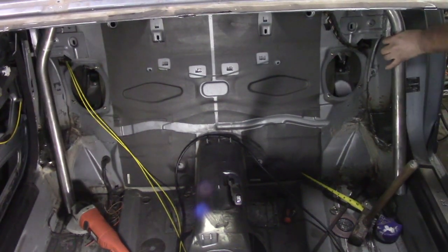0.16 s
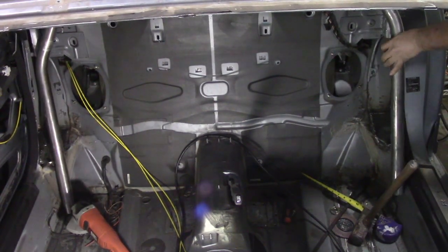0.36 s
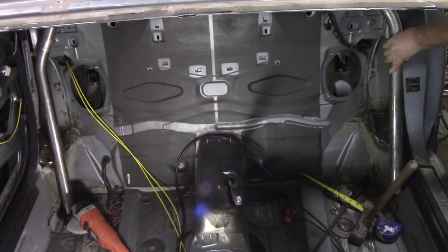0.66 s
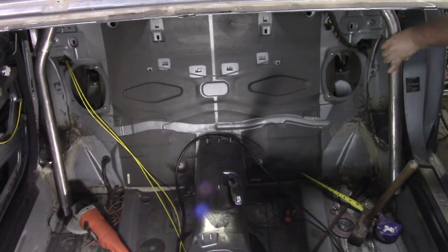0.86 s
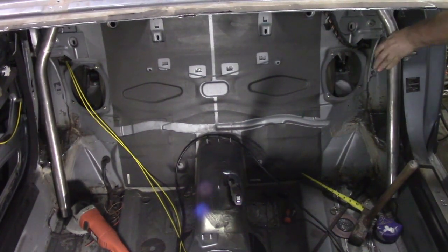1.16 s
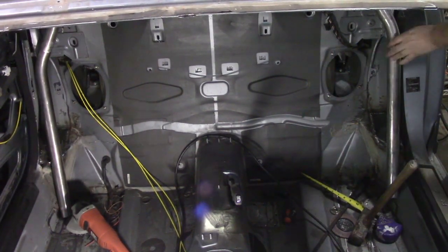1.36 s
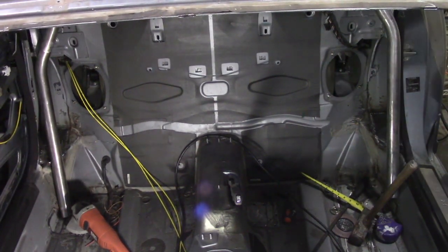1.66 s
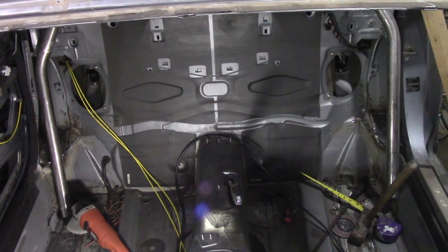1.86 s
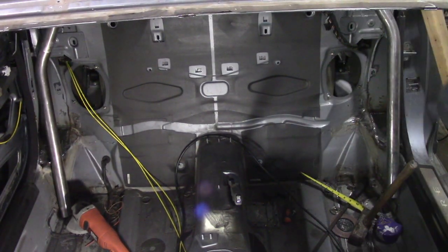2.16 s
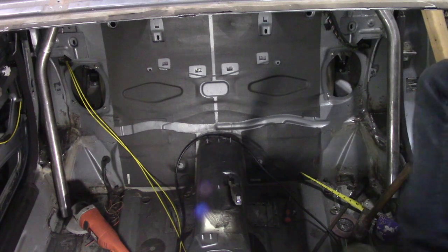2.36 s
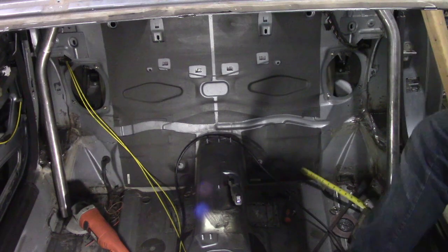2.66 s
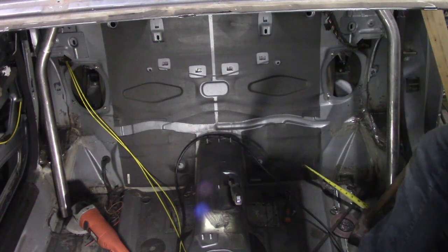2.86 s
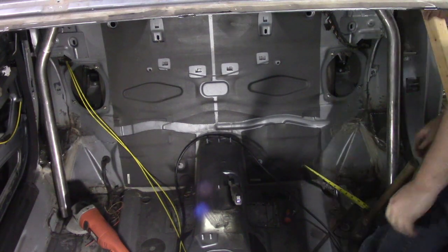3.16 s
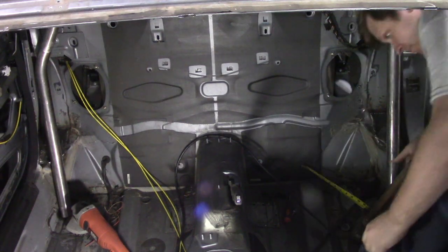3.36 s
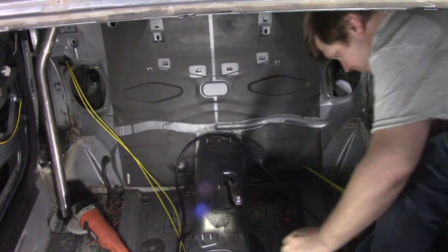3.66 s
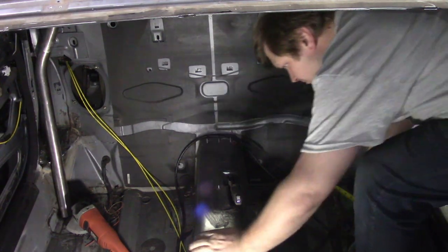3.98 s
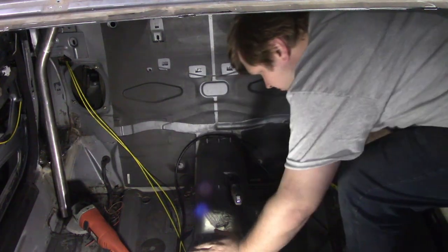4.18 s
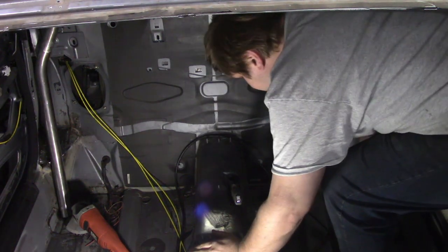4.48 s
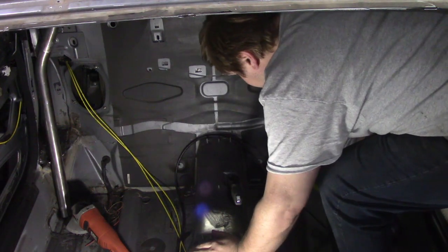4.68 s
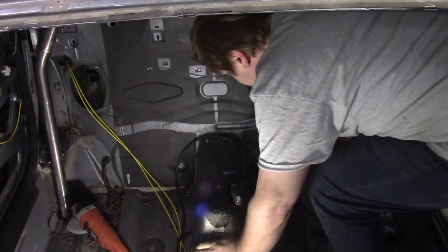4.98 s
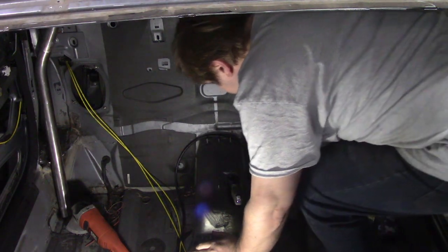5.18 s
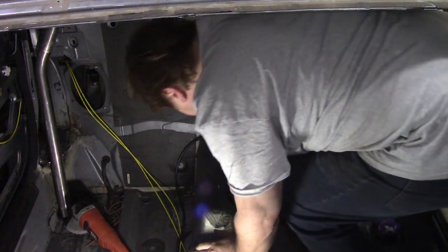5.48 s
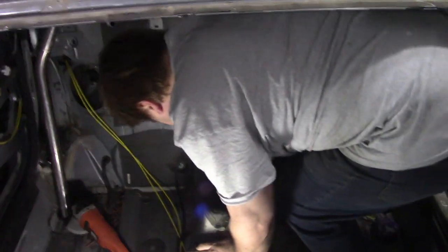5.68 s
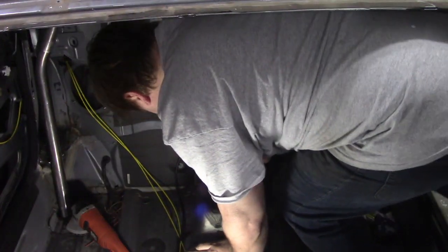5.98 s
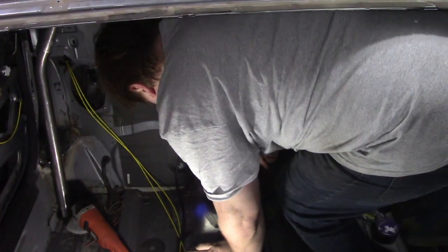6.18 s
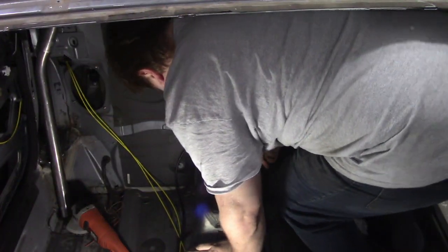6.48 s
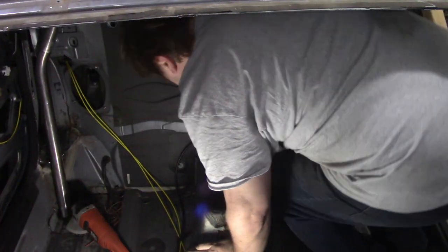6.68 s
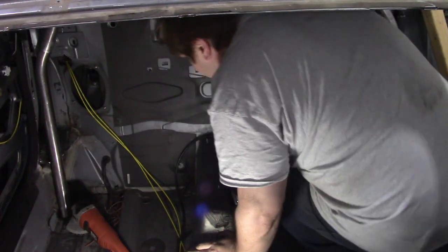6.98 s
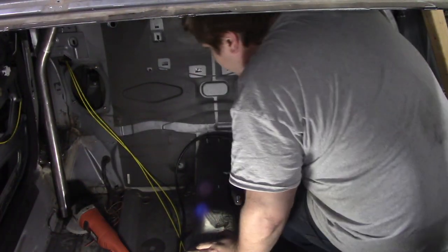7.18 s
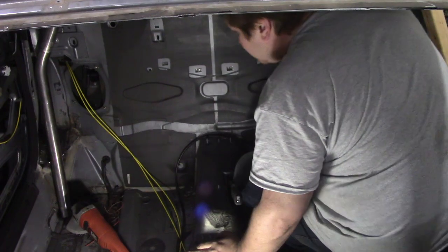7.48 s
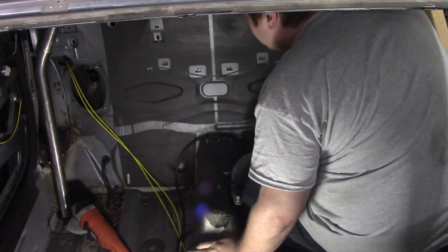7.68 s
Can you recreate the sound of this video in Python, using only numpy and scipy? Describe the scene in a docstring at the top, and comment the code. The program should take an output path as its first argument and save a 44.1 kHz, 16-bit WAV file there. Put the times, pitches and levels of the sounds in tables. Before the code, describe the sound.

Close, hollow, bare-metal sound inside a stripped car shell in a garage, with faint steady hiss. At 0 s a hard steel-tube knock rings; more follow at 0.26 and the strongest near 0.5, with brief sliding scrapes and beating metallic ringing. Duller booming thuds cluster at 0.9-1.03 s, then the ring dies into quiet, with a slight cloth brush at 2.2. At 2.7-2.8 s the loudest floor-pan bangs burst out, followed by clacks near 2.95 and 3.05. Scuffs, a thud and clatter come at 3.5-3.75, a crisp tick at 3.94, and scrape and sharp clack around 4.4-4.55. Clothes rustle from 5.1 to 6.2; a deep boom hits at 5.6, with clacks to 5.85. A rapid rattle runs 6.43-6.58. Soft scuffing, grit ticks and small taps follow from 6.9, fading toward 7.8 s.

```python
"""Knocks of a heavy steel tube cage ring out as it is shoved into place inside a stripped car body in a garage.
Then someone climbs in, and the bare floor pan booms, clacks and scrapes; clothes rustle over a faint room hiss.
Impacts excite dense noise-like modes, decaying sines and beating clusters; rubbing is noise shaped by pressure.
Grit cracks in short bright noise bursts, and close steel walls return quick treble echoes."""
import sys
import numpy as np
from scipy import signal
from scipy.io import wavfile
from scipy.ndimage import uniform_filter1d

SR = 44100
rng = np.random.default_rng(int(sys.argv[2]) if len(sys.argv) > 2 else 0)


def store_wav(level_fs):
    """Save 16-bit WAV to argv[1]."""
    pcm = np.round(np.clip(np.atleast_2d(level_fs), -1, 1) * 32767)
    wavfile.write(sys.argv[1], SR, pcm.T.astype(np.int16))


N = 345744
RING = int(1.3 * SR)  # samples computed for each ringing sound
CUTOFF_HZ = 16000
BANDS = 31.25 * 2 ** (np.arange(28) / 3)  # third-octave centres, f/Hz

# Registers of a blow, boom, body, clank and crack: f/Hz
REGISTER_HZ = [170, 600, 2500, 7000]
# In the three blow tables, level is the force at the body register, before colour and modes.
# Cage against shell: t/s, contact/s, level/dB, extra bass/dB, treble tilt/(dB per octave), panel note f/Hz
CAGE_KNOCKS = [(0.0, 0.0019, -17, 2, -4, 119), (.264, 0.0023, -17, -0.5, -2.5, 212),
               (0.342, 0.002, -29, -12, -12, 324), (.439, .001, -29.5, 1.5, -2.06, 346),
               (.493, 0.0056, -14, -3, -8, 249), (.645, 0.011, -29.5, -5.5, -22, 260)]
# Cage foot or body weight landing on the floor pan: columns as for the knocks
FLOOR_THUDS = [(.880, 0.024, -30, 5.5, -1.5, 232.6), (.937, 0.0054, -17, 1, -5, 147.1),
               (.957, 0.011, -19.5, 1, -2.8, 268), (.990, 0.006, -26.5, 4, -2, 396),
               (1.033, 0.015, -29, 8.5, -8, 144.7), (2.655, 0.024, -27.5, 6.5, -2.5, 115.7),
               (2.697, 0.0009, -7.5, -18, -7, 352.7), (2.724, 0.004, -27, 3, -0.5, 656),
               (2.772, .014, -10, -18, -9, 421.4), (2.816, 0.0084, -16, -10.5, -6, 167.5),
               (3.612, 0.0055, -18, -13.5, -14, 177), (5.125, 0.011, -52.5, 2, -10, 173.4),
               (5.588, 0.0024, -20, -8.5, -5, 487), (5.623, 0.0046, -13, -11.5, -6, 125.3),
               (5.637, .008, -19, -2, -12, 235.1), (6.085, 0.0097, -43, -15, -8.5, 398),
               (6.255, .005, -43.5, -7, -9, 444), (7.228, 0.031, -37.5, 0.5, -5.5, 139)]
# Steel parts clattering on the sheet: t/s, contact/s, level/dB, extra bass/dB, treble tilt/(dB per octave)
SHEET_CLACKS = [(2.938, .002, -27.5, -4, -1.1), (3.050, .0014, -35.5, 0.5, 1.97),
                (3.527, 0.0028, -30, -11, 0.3), (3.590, 0.025, -19.5, -18, -2.5),
                (3.724, 0.0078, -32, -7, -1.2), (3.941, 0.00051, -21.5, -14, 1.05),
                (4.054, 0.0031, -36.5, -14, 0), (4.392, 0.012, -26.5, -9.5, 0.4),
                (4.531, 0.0023, -16.5, -7, -1.2), (4.568, 0.0024, -24, -1.5, -0.5),
                (5.376, 0.0095, -39.5, -8, -1.1), (5.460, .0009, -41.5, -37, -0.2),
                (5.534, 0.0046, -40.5, -18, -1), (5.732, 0.0027, -24, -2.5, -2.5),
                (5.836, 0.0052, -28, -1, -1.5), (6.433, 0.0052, -27, 1, -1.3),
                (6.452, 0.014, -16.5, -14, -1.7), (6.478, 0.0011, -22, -11, -1),
                (6.510, 0.0068, -21.5, -6, -3.5), (6.536, .002, -24.5, -11, 0),
                (6.576, 0.0028, -28, 2, -0.8), (7.138, .002, -27, -19, -2),
                (7.608, 0.00092, -45.5, -7, -1.5)]
# Dry snaps of grit: t/s, level/dB before the band filter
GRIT_SNAPS = [(.649, -47), (6.008, -24), (6.891, -38.5), (7.023, -45)]
# Steel parts that ring, ping or squeak: t/s, contact/s, f/Hz, width/Hz, level/dB, t60/s
PART_PINGS = [(.440, .001, 13500, 1500, -51, 0.19), (.925, 0.04, 4690, 89, -40, 0.79),
              (2.725, 0.0036, 5080, 300, -27.5, 0.13), (2.776, 0.011, 9000, 121, -41.5, 0.25),
              (4.445, 0.015, 6460, 2170, -32.5, 0.25), (3.527, 0.0015, 3154, 697, -37.5, 0.37),
              (5.588, .001, 5940, 420, -31, 0.1), (5.622, .004, 3220, 60.6, -43, 0.77),
              (5.623, .004, 5760, 40, -45, 0.46), (6.538, .002, 2900, 598, -33, 0.18),
              (7.408, 0.021, 3180, 600, -45, 0.2)]

# Clusters of bending modes of the knocked cage: f/Hz, width/Hz, relative level/dB, t60/s
CAGE_MODES = [(1484, 116, -6, 0.67), (1960, 56, -15, 0.76), (2137, 70.4, -5, 0.63), (2900, 54, -16, 0.88),
              (3018, 98, -6.5, 0.21), (4020, 80, -33, .5), (4740, 61, -16.5, 0.55), (5160, 155, -18, 0.28),
              (6900, 70, -29, 0.27)]
# Modes that sliding draws from the tube: f/Hz, relative level/dB, t60/s
SLIDING_MODES = [(4650, -7, 0.67), (4813, -0.5, 0.12), (4810, -3, 0.21), (7100, -25, .2), (13130, -21, .05)]
# Long-ringing modes of the body shell: f/Hz, relative level/dB, t60/s
SHELL_MODES = [(144.6, 3, 0.67), (165, -16, 0.74), (239.9, 2.5, 0.72), (269.4, -4, 0.33),
               (349.6, 0.5, 0.57), (398.3, 0, 0.86), (469.6, 1.5, 0.53), (589.5, -11, 0.99),
               (621, -15.5, 1), (700, -22, 1), (769.7, -4.5, 0.69), (876, -10.5, 0.87), (952, -7.5, 0.5),
               (1038, -33, 0.32), (1104, -5, 0.4), (1146, -9, 0.53), (1232, -9, 0.39), (1430, -3, 0.39),
               (1663, -28, 0.86), (2040, -15.5, 0.66), (2370, -42, 0.77), (2750, -11.5, 0.48),
               (3030, -7, 0.51), (3190, -12, 0.69), (4000, -33, 0.45), (5755, -2, 0.15), (6270, -22, 0.38),
               (7040, -38, 0.42), (9100, -29, 0.29)]
# Decay of shell and garage together: f/Hz, t60/s
REVERBERATION = [(100, 0.69), (300, 0.92), (1000, 0.9), (3000, 0.77), (6000, 0.56), (14000, 0.21)]

# Spectra of impact and rubbing, each: f/Hz, level/dB per third octave
KNOCK_SPECTRUM = [(40, -36), (95, -50), (125, -16), (250, -7), (500, -5), (700, -18), (1100, -9),
                  (1600, -8), (2500, -7.5), (3200, -9), (5000, -5.5), (6300, -10.5), (10000, -21),
                  (15000, -28)]
FLOOR_SPECTRUM = [(40, -33), (95, -27), (125, -7.5), (200, -8), (320, -6), (500, -9.5), (800, -9.5),
                  (1300, -6), (2000, -10), (3100, -11.5), (4000, -11), (6000, -8.5), (10000, -12.5),
                  (15000, -23)]
CLACK_SPECTRUM = [(40, -49), (95, -40), (130, -20), (210, -9), (400, -8.5), (600, -12), (1100, -10.5),
                  (2000, -10.5), (3200, -10.5), (4000, -12.5), (6000, -9.5), (8000, -13), (10000, -13),
                  (15000, -24)]
SCUFF_SPECTRUM = [(30, -66), (90, -32), (160, -14), (400, -10.5), (900, -12.5), (2000, -18.5), (3200, -15),
                  (7000, -18.5), (10000, -23), (15000, -32)]
SLIDE_SPECTRUM = [(30, -50), (100, -9.5), (250, 5.5), (800, -4.5), (2500, -10.5), (3800, -15), (5000, -5.5),
                  (7000, -12.5), (11000, -14.5), (15000, -20)]
CLOTH_SPECTRUM = [(30, -60), (150, -48), (500, -11), (1500, -11), (4000, -10.5), (7000, -12.5),
                  (11000, -15), (15000, -27)]
# Room hiss common to both capsules: f/Hz, level/dB per third octave
HISS_SPECTRUM = [(30, -100), (50, -85), (70, -72), (100, -72), (160, -68.5), (320, -65), (600, -67),
                 (1200, -69), (3000, -72.5), (6000, -71), (10000, -77.5), (15000, -79)]
# Faint noise of opposite sign in the two capsules: f/Hz, level/dB per third octave
SIDE_NOISE_SPECTRUM = [(40, -98), (100, -90), (320, -75.5), (1000, -76.5), (3000, -79.5), (9000, -87.5),
                       (13000, -97), (15000, -110)]

# Tube sliding on the shell: t/s, hold/s, level/dB
TUBE_SLIDES = [(0, 0.037, -47), (.22, 0.069, -47.5), (.455, .01, -44.5), (.95, 0.058, -38.5),
               (1.15, 0.45, -67)]
# Soles and knees scuffing over the floor: t/s, hold/s, level/dB
FLOOR_SCUFFS = [(3.57, 0.13, -38.5), (3.92, 0.12, -39.5), (4.39, .05, -39.5), (4.47, 0.077, -31.5),
                (5.42, .16, -50.5), (6.25, 0.03, -45), (6.92, 0.5, -47)]
# Clothes brushing: t/s, hold/s, level/dB
CLOTH_BRUSHES = [(2.23, 0.021, -53), (2.6, 1.5, -63.5), (5.11, 1.09, -55), (6.92, .05, -52),
                 (7.55, 0.089, -58.5)]
# Rise and fall of a rubbing stroke, dB per second
SLIDE_RATES, SCUFF_RATES, CLOTH_RATES = (84, 150), (210, 87), (38, 29)

# Grit crushed by a clack: level over the force, and loss per second of contact
CRUSH_DB, CRUSH_LOSS_DB_PER_S = 2, 2500
# Loose grit popping at random: mean rate, level relative to the rubbing, and random spread
GRIT_PER_S, GRIT_OVER_RUB_DB, GRIT_SPREAD_DB = 16, -3, 4.5


def from_db(db):
    """Definition of level: 20 dB is a tenfold amplitude."""
    return 10 ** (np.asarray(db) / 20)


def at_hz(points, hz):
    """Spectral interpolation: values run linearly over log frequency."""
    f, value = np.transpose(points)
    return np.interp(np.log(hz), np.log(f), value)


def decay_60(t, t60):
    """Exponential decay: amplitude falls by 60 dB in t60 seconds."""
    return np.exp(-np.log(1000) * t / t60)


def band_gains(colour):
    """Spectral shaping: one amplitude per third octave."""
    return from_db(at_hz(colour, BANDS)).astype(np.float32)


def filtered(order, hz, kind, x):
    """Butterworth filtering: a maximally flat pass band."""
    return signal.sosfilt(signal.butter(order, hz, kind, fs=SR, output="sos"), x)


def add(out, s, sound):
    """Superposition: a sound starting at time s adds to the rest."""
    i = round(s * SR)
    out[i:i + len(sound)] += sound[:N - i]


def wobble(per_s, size):
    """Random modulation: Gaussian values of unit spread joined by straight lines."""
    knots = np.arange(size) * per_s / SR
    return np.interp(knots, np.arange(N // 8), rng.standard_normal(N // 8))


def dense_modes():
    """Modal overlap: countless close modes act as third-octave noise, here levelled to rms 1."""
    white, out = rng.standard_normal((2, N + SR)), []
    for k, hz in enumerate(BANDS):
        edges = hz * 2 ** (np.array([-1, 1]) / 6)
        band = filtered(2, edges, "band", white[k % 2])  # neighbouring bands use separate noises
        rms = np.sqrt(uniform_filter1d(band ** 2, size=3000) + 1e-18)
        out.append((band / rms)[SR:])
    return np.array(out, dtype=np.float32)


def room_hiss(modes):
    """Stationary background: steady noise with a fixed third-octave spectrum."""
    return band_gains(HISS_SPECTRUM) @ modes


def side_noise(modes):
    """Stereo width: a faint noise reaches the two capsules with opposite sign."""
    side = np.roll(band_gains(SIDE_NOISE_SPECTRUM) @ modes, N // 2)
    return np.array([side, -side])


def cabin(x, echo_db, fade_s, corner_hz, count=24):
    """Comb interference: quick echoes from bare steel walls close by colour the treble."""
    delays = rng.uniform(.002, .03, count)  # seconds
    echoes = np.zeros(SR // 20)
    echoes[(delays * SR).astype(int)] = rng.choice([-1, 1], count) * np.exp(-delays / fade_s)
    echoes /= np.linalg.norm(echoes)
    bright = filtered(2, corner_hz, "high", x)
    return x + from_db(echo_db) * signal.fftconvolve(bright, echoes)[:N]


def microphone(x, side_db, corner_hz, top_hz):
    """Close capsule pair: short scattered treble enters with opposite sign, with a 0.1 dB gain offset."""
    t = np.arange(SR // 20) / SR
    scatter = rng.standard_normal(len(t)) * np.exp(-t / 0.014)
    side = signal.fftconvolve(x, scatter / np.linalg.norm(scatter))[:N]
    side = from_db(side_db) * filtered(1, [corner_hz, top_hz], "band", side)
    return np.array([from_db(.1) * (x + side), x - side])


def strokes(rows, rates):
    """Rubbing envelope: level rises, holds and falls linearly in dB; the strongest stroke prevails."""
    t, (rise, fall) = np.arange(N) / SR, rates
    levels = []
    for s, hold, db in rows:
        before, after = np.maximum(s - t, 0), np.maximum(t - s - hold, 0)
        levels.append(db - rise * before - fall * after)
    return from_db(np.max(levels, axis=0))


def friction(modes, colour, pressure, grain_db, grains_per_s):
    """Stick-slip friction: surfaces catch and slip, so their noise comes in grains."""
    noise = np.roll(band_gains(colour) @ modes, rng.integers(N))
    return noise * pressure * from_db(grain_db * wobble(grains_per_s, N))


def blow_force(db, bass_db, tilt):
    """Impact spectrum, f/Hz, level/dB: weight adds boom, soft contact tilts the treble down."""
    boom_hz, body_hz = REGISTER_HZ[:2]
    upper = [(hz, db + tilt * np.log2(hz / body_hz)) for hz in REGISTER_HZ[1:]]
    return [(boom_hz, db + bass_db)] + upper


def snaps(rubbing, fade_s, low_hz, high_hz):
    """Brittle fracture: grit cracks under load, clacks and rubbing in bright, brief noise bursts."""
    out, t = np.zeros(N), np.arange(SR // 20) / SR
    fade = np.exp(-t / fade_s)
    crushed = []
    for s, contact, *blow in SHEET_CLACKS:
        force_db = at_hz(blow_force(*blow), low_hz)
        # softer contacts crush less
        crushed.append((s, force_db + CRUSH_DB - CRUSH_LOSS_DB_PER_S * contact))
    for s, db in GRIT_SNAPS + crushed:
        add(out, s, from_db(db) * fade * rng.standard_normal(len(t)))
    happens = rng.random(N) < GRIT_PER_S / SR
    pops = happens * rubbing * from_db(GRIT_OVER_RUB_DB + GRIT_SPREAD_DB * rng.standard_normal(N))
    out += signal.fftconvolve(pops, fade)[:N] * rng.standard_normal(N)
    return 2 * filtered(2, [low_hz, high_hz], "band", out)


def cluster(hz, width_hz, t60):
    """Beating: seven close modes interfere as they die away."""
    t = np.arange(RING) / SR
    spread = width_hz * (np.arange(7) - 3 + rng.uniform(-.5, .5, 7)) / 6
    phase = (hz + spread)[:, None] * t + rng.random((7, 1))  # cycles
    beats = np.sin(2 * np.pi * phase).sum(axis=0)
    return beats * np.sqrt(2 / 7) * decay_60(t, t60)


def pings():
    """Local resonance: each small part answers at a pitch of its own."""
    out, t = np.zeros(N), np.arange(RING) / SR
    for s, contact, hz, width, db, t60 in PART_PINGS:
        add(out, s, from_db(db) * cluster(hz, width, t60) * np.minimum(t / contact, 1))
    return out


def ring(force, hz, t60):
    """Damped resonator: a unit click starts a decaying sine of height about 1."""
    r, w = from_db(-60 / (t60 * SR)), 2 * np.pi * hz / SR
    return signal.lfilter([0, np.sin(w)], [1, -2 * r * np.cos(w), r * r], force + 1e-18)


def tube(load, knocked_db, drive_hz, rubbed_db, bite):
    """Free and driven vibration: the cage rings when knocked and sings when it slides under load."""
    out = np.zeros(N)
    for s, _, *blow, _ in CAGE_KNOCKS:
        ring_db = knocked_db + at_hz(blow_force(*blow), drive_hz)
        ringing = sum(from_db(db) * cluster(hz, width, t60) for hz, width, db, t60 in CAGE_MODES)
        add(out, s, from_db(ring_db) * ringing)
    rub = from_db(rubbed_db) * (load / load.max()) ** bite * rng.standard_normal(N)
    # dividing by sqrt(t60) offsets the greater build-up of long-ringing modes
    return out + sum(from_db(db) * ring(rub, hz, t60) / np.sqrt(t60) for hz, db, t60 in SLIDING_MODES)


def panel_notes(table, t60, level_db):
    """Panel resonance: a heavy blow makes its patch drum at one note, louder with weight."""
    out, t = np.zeros(N), np.arange(RING) / SR
    for s, contact, db, bass_db, _, hz in table:
        swell = 1 - np.exp(-t / contact)
        note = swell * np.sin(2 * np.pi * hz * t) * decay_60(t, t60)
        add(out, s, from_db(db + bass_db / 2 + level_db) * note)
    return out


def blows(table, modes, colour, early_t60, tail_db, treble_haste, grit_db, shell_db):
    """Two-stage decay: a blow floods the sheet's modes; its spot dies fast, shell and garage ring on."""
    out, t = np.zeros(N), np.arange(RING) / SR
    spot_t60 = early_t60 * (BANDS / 1000) ** -treble_haste  # early_t60 holds at 1 kHz
    spot = decay_60(t, spot_t60[:, None])
    tail = from_db(tail_db) * decay_60(t, at_hz(REVERBERATION, BANDS)[:, None])
    decay = np.hypot(spot, tail).astype(np.float32)
    shell_hz, mode_db, t60 = np.transpose(SHELL_MODES)
    shell = np.sin(2 * np.pi * shell_hz[:, None] * t) * decay_60(t, t60[:, None])
    treble = BANDS > REGISTER_HZ[2]
    for s, contact, db, bass_db, tilt, *_ in table:
        force = blow_force(db, bass_db, tilt)
        gains = from_db(at_hz(force, BANDS) + at_hz(colour, BANDS)).astype(np.float32)
        start = rng.integers(N - RING)
        sheet = decay * modes[:, start:start + RING]
        # the touching surfaces rattle, less and less
        chatter = from_db(grit_db * wobble(610, RING) * np.exp(-t / 0.03))
        uneven_db = rng.normal(0, 0.82, len(shell_hz))
        share = from_db(shell_db + mode_db + at_hz(force, shell_hz) + uneven_db)
        share *= rng.choice([-1, 1], len(shell_hz))  # each spot pushes each mode its own way
        low, high = (gains * ~treble) @ sheet, (gains * treble) @ sheet
        sound = low + chatter * high + share @ shell
        add(out, s, sound * np.minimum(t / contact, 1))
    return out


def scene():
    """Superposition of sources: hiss, rubbing, grit and blows, heard from inside the car."""
    modes = dense_modes()
    push, tread = strokes(TUBE_SLIDES, SLIDE_RATES), strokes(FLOOR_SCUFFS, SCUFF_RATES)
    brush = strokes(CLOTH_BRUSHES, CLOTH_RATES)

    hiss = room_hiss(modes)
    cloth = friction(modes, CLOTH_SPECTRUM, brush, grain_db=1.2, grains_per_s=330)
    scuff = friction(modes, SCUFF_SPECTRUM, tread, grain_db=0.5, grains_per_s=950)
    slide = friction(modes, SLIDE_SPECTRUM, push, grain_db=2.5, grains_per_s=260)
    grit = snaps(push + tread, fade_s=0.00093, low_hz=5330, high_hz=12400)

    clatter = blows(SHEET_CLACKS, modes, CLACK_SPECTRUM, early_t60=0.18, tail_db=-9.5,
                    treble_haste=0.33, grit_db=4.5, shell_db=-17.5)
    floor = blows(FLOOR_THUDS, modes, FLOOR_SPECTRUM, early_t60=0.4, tail_db=-6.5,
                  treble_haste=0.26, grit_db=3.0, shell_db=-9.0)
    floor += panel_notes(FLOOR_THUDS, t60=0.65, level_db=1.5) + pings()
    # the stiff tube hardly rattles: small grit_db
    cage = blows(CAGE_KNOCKS, modes, KNOCK_SPECTRUM, early_t60=0.18, tail_db=-10.0,
                 treble_haste=0.68, grit_db=2.0, shell_db=-15.5)
    cage += panel_notes(CAGE_KNOCKS, t60=0.51, level_db=-2.5)
    cage += tube(push, knocked_db=-8.0, drive_hz=1700, rubbed_db=-71, bite=1.84)

    # the blows carry little deep bass below about 85 Hz
    steel = filtered(3, 85, "high", cage + floor + clatter)
    inside = cabin(steel + slide + scuff, echo_db=-10, fade_s=0.0069, corner_hz=1410)
    heard = inside + cloth + grit + hiss
    return microphone(heard, side_db=-17.0, corner_hz=1530, top_hz=8950) + side_noise(modes)


def record(dry):
    """Saturation and band limiting: peaks are rounded smoothly, then the top is cut."""
    top = 0.76
    rounded = top * np.tanh(dry / top)
    low_pass = signal.cheby2(14, 70, CUTOFF_HZ + 700, fs=SR, output="sos")  # 70 dB down from its edge up
    return signal.sosfilt(low_pass, rounded)


dry = scene()
out = record(dry)
store_wav(out)
```